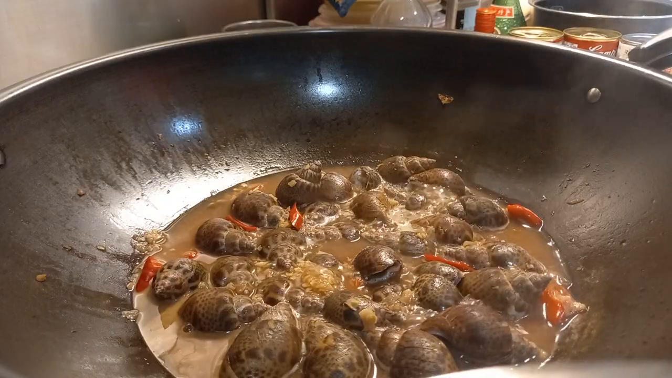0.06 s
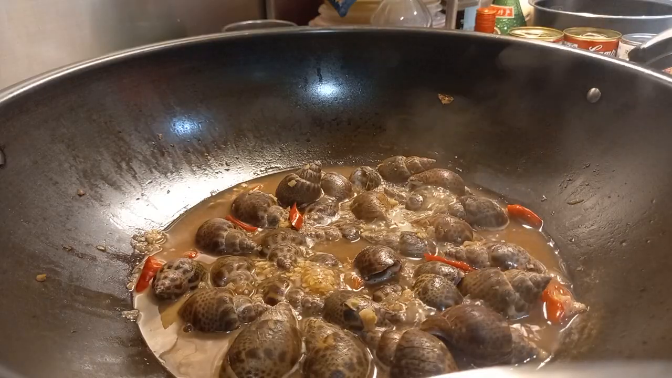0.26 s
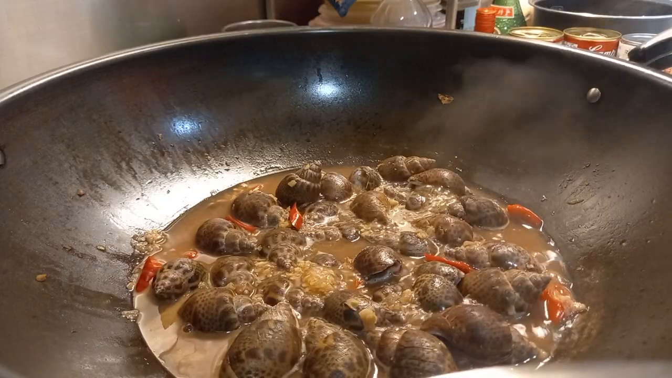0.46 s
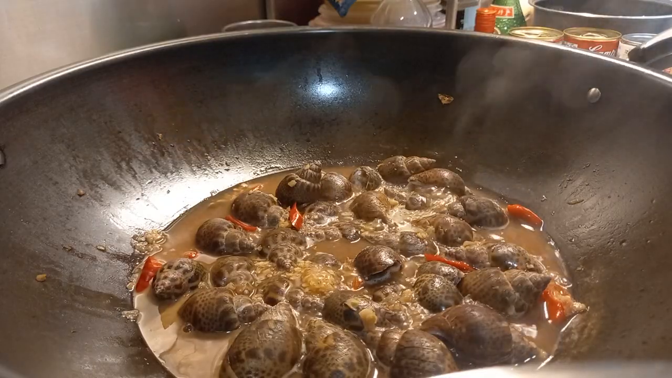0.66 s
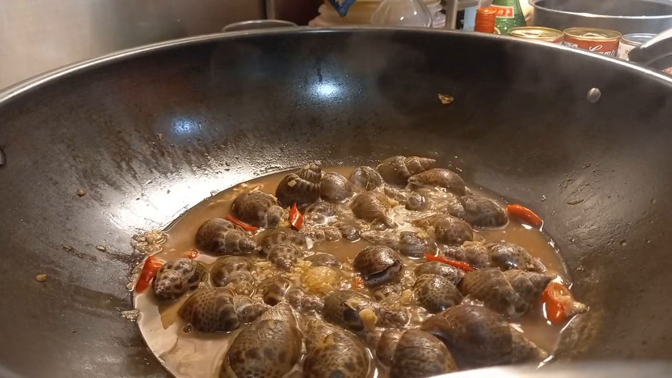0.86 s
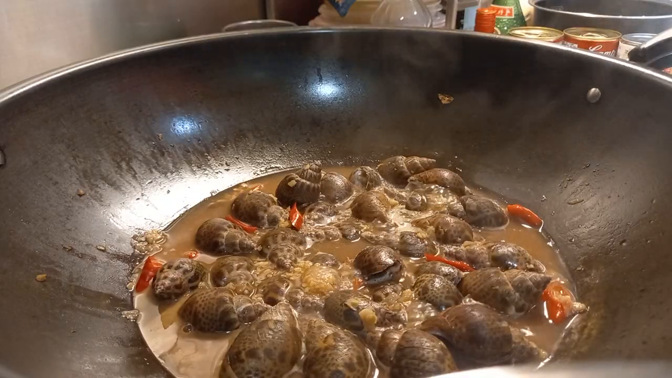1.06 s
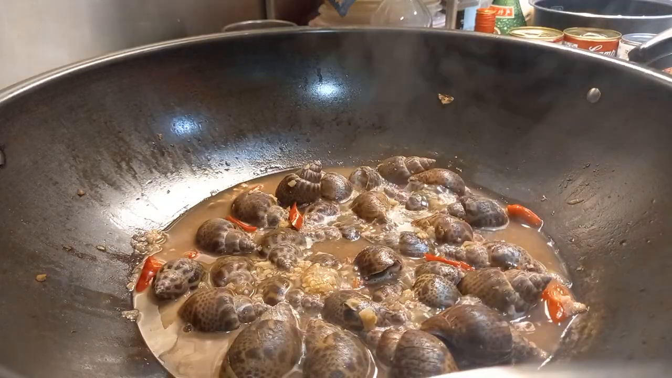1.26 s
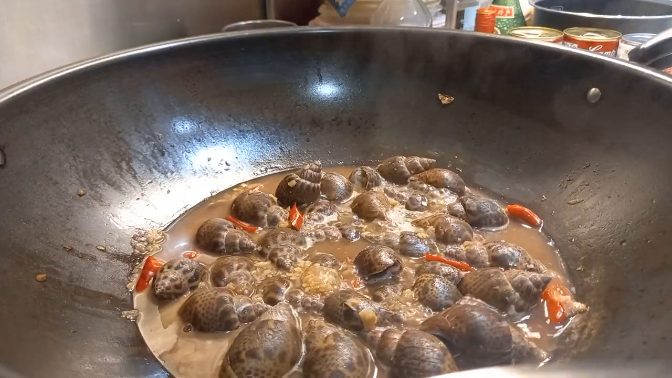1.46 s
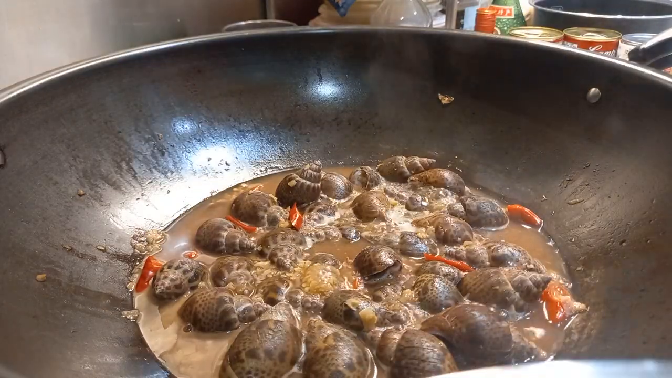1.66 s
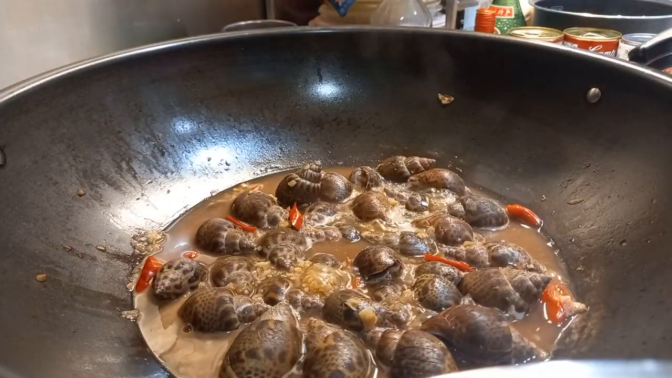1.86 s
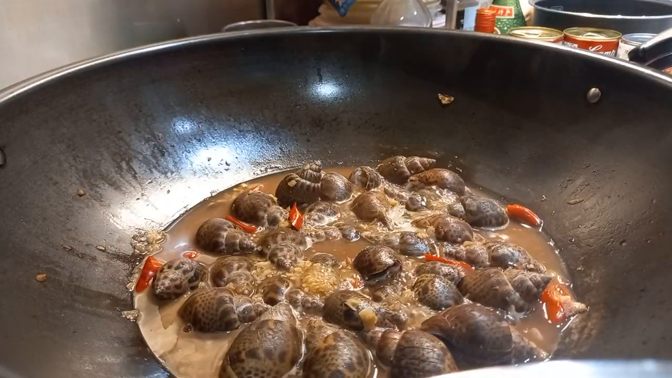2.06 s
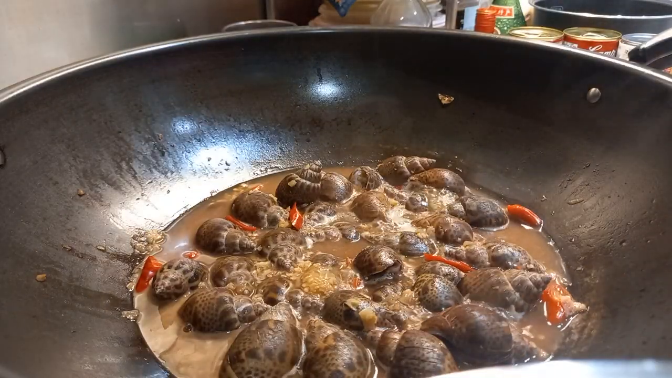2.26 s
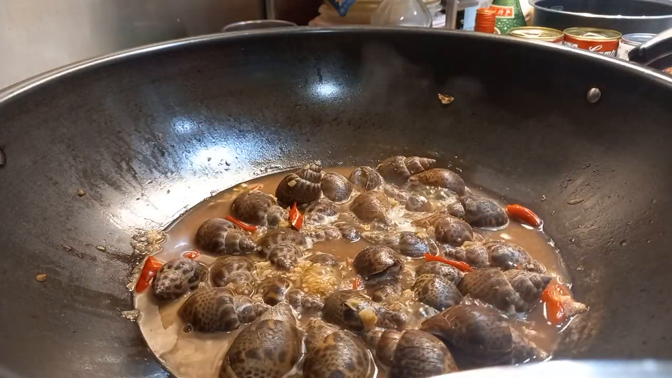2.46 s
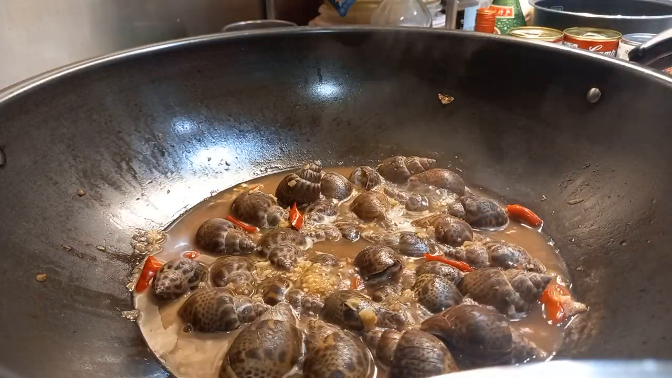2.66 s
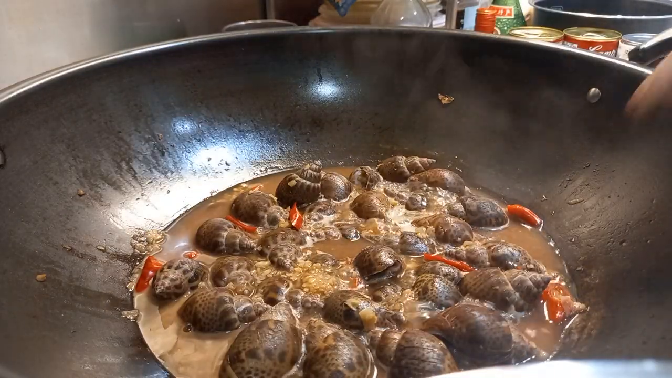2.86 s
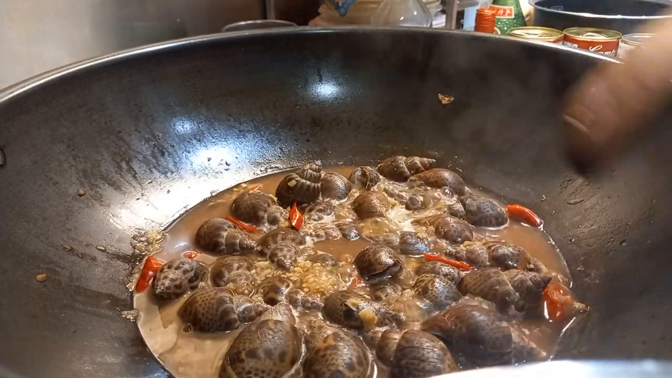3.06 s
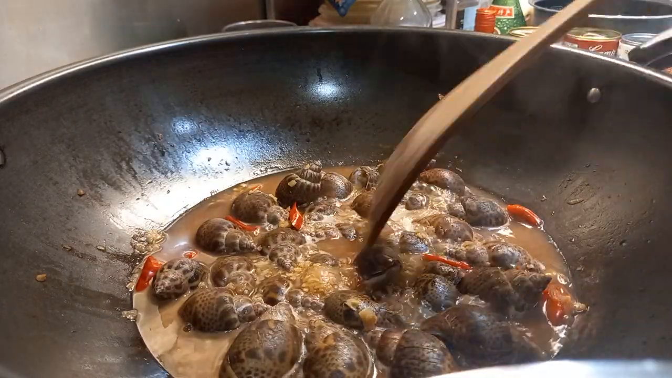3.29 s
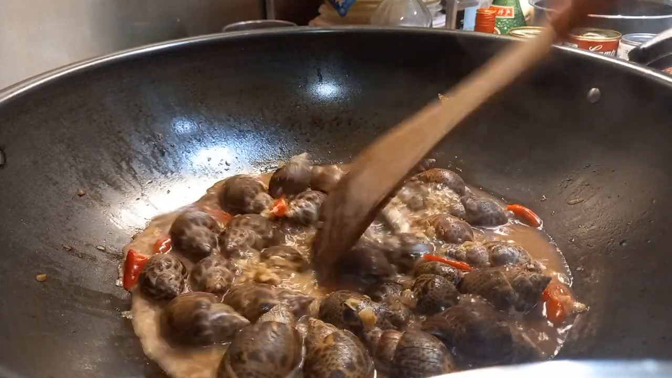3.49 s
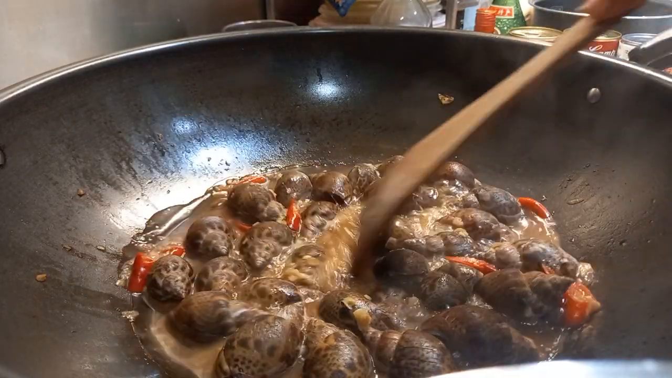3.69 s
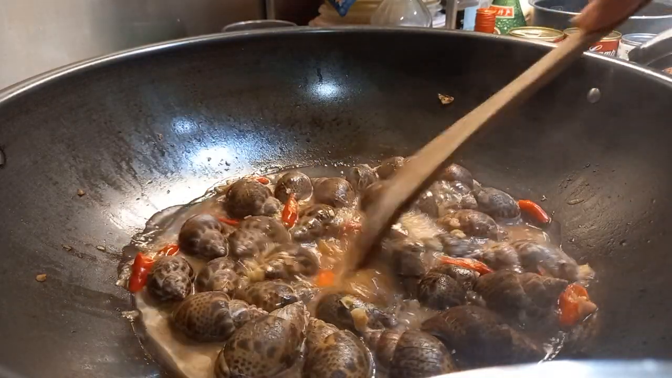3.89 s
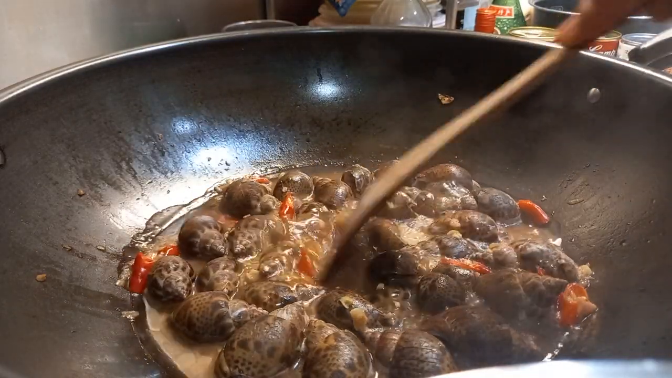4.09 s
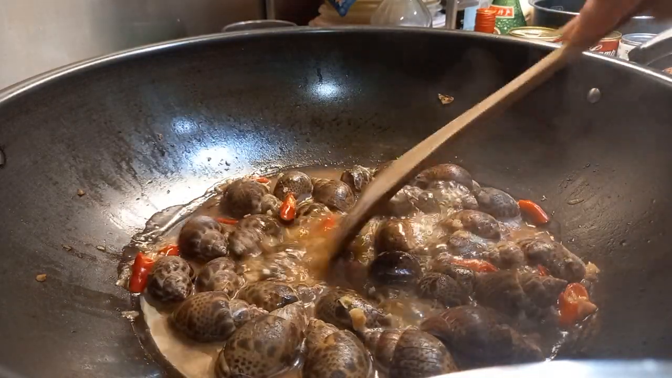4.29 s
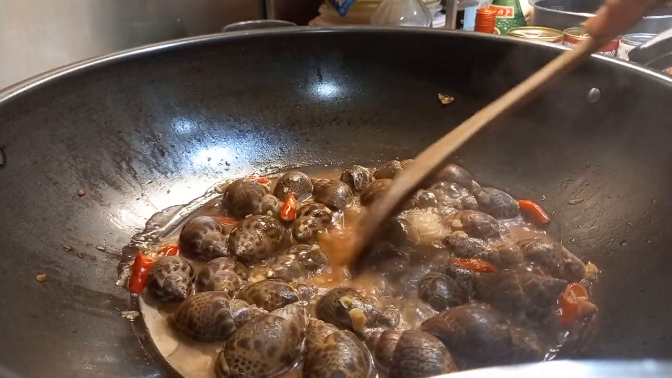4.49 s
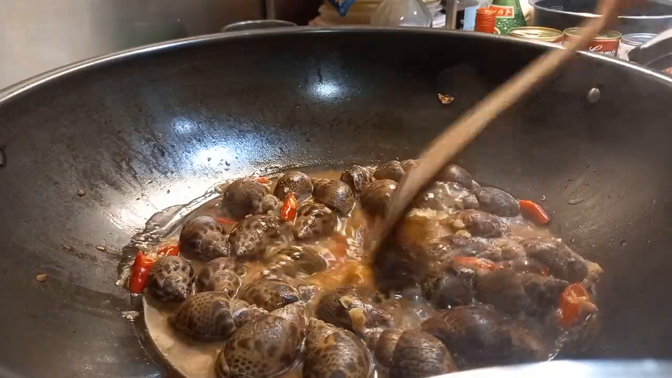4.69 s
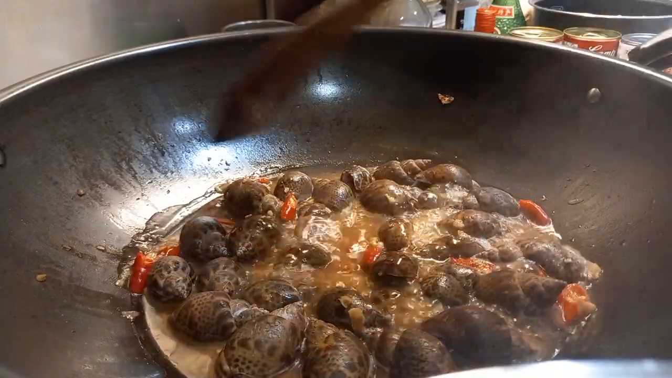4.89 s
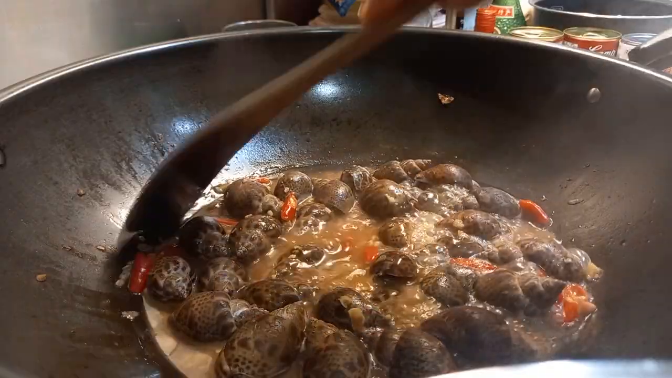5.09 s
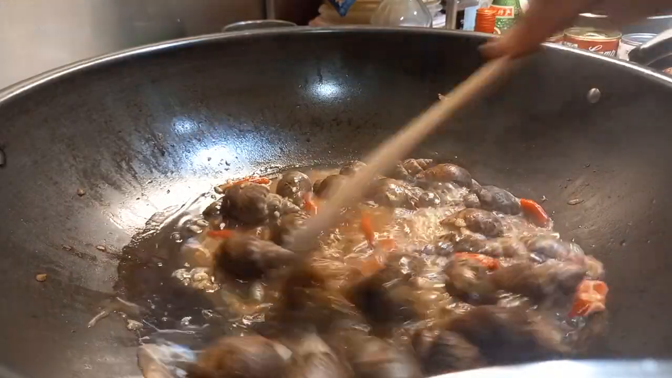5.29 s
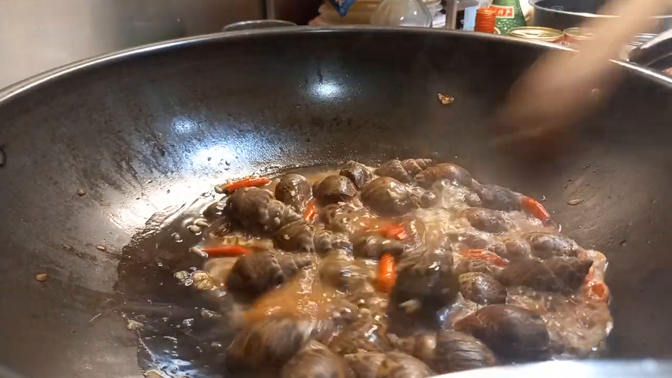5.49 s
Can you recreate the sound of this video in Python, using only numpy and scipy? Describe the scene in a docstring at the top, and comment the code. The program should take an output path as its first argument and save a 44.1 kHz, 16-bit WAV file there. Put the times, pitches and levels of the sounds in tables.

```python
"""Snail shells in a wok

Snail shells simmer in a steel wok: hissing sauce and chirping bubbles over a wavering fan hum in rumbling air.
Noisy resonances clack further off, then a low boom and rattle bump the microphone's stand and the gain ducks.
A wooden spoon rings the wok's damped modes and pushes the heap: bursts of short modes make loud shell clicks
and many small ticks, echoed by bowl and room."""
import sys
import numpy as np
from scipy import signal
from scipy.fft import rfft, irfft
from scipy.io import wavfile
from scipy.ndimage import uniform_filter1d, minimum_filter1d

SR = 44100
rng = np.random.default_rng(int(sys.argv[2]) if len(sys.argv) > 2 else 0)


def put_to_file(sound):
    """Save the sound as 16-bit audio at rate SR, in the file named by the first command-line argument."""
    columns = np.atleast_2d(sound).T  # one column per channel
    safe = np.clip(columns, -1, 1)
    whole_steps = np.round(safe * 32767)
    wavfile.write(sys.argv[1], SR, whole_steps.astype(np.int16))


N = 244314
TIME = np.arange(N) / SR  # s

# tone colour of the shells' hard lips: [f/Hz, relative level/dB]
LIP_COLOUR = [(1500, -4), (2600, -6), (4000, 2.5), (5200, -0.5), (6600, -0.5), (9000, -2.5), (15000, -10.5)]
# tone colour of the shells' hollow bodies: [f/Hz, relative level/dB]
HOLLOW_COLOUR = [(200, -21), (500, 3.5), (900, -10), (1400, 1), (2200, -0.5), (3200, -0.5), (6000, -27.5)]
# loudness of the sauce as it heats up: [t/s, level/dB]
SAUCE_HEAT = [(0, -62.5), (1.5, -59), (2.3, -72), (2.52, -50), (3.3, -50.5), (4.4, -49.5), (5.54, -45)]


def undb(db):
    """Turn decibels into a factor."""
    return 10 ** (np.asarray(db) / 20)


def unit(x):
    """Scale to rms 1."""
    return x / np.sqrt(np.mean(x ** 2))


def impulse(x):
    """Scale to energy 1 in each channel."""
    return x / np.sqrt(np.sum(x ** 2, axis=-1, keepdims=True))


def curve(rows):
    """Join (time, value) points by straight lines."""
    return np.interp(TIME, *np.transpose(rows))


def fade(t60, size):
    """Exponential decay, 60 dB down after t60 seconds."""
    return np.exp(-np.log(1000) * TIME[:size] / max(t60, 1 / SR))


def add(track, s, sound):
    """Mix a sound in at time s."""
    i = int(s * SR)
    track[..., i:i + sound.shape[-1]] += sound[..., :N - i]


def ring(x, response):
    """Pass a sound through an impulse response."""
    full = signal.fftconvolve(np.atleast_2d(x), np.atleast_2d(response), axes=-1)
    return full[:, :x.shape[-1]]


def colour(x, points, size=4096):
    """Filter through (Hz, dB) points without sounding early; white noise keeps its power."""
    hz, db = np.transpose(points)
    bins_hz = np.arange(size // 2 + 1) * SR / size
    log_gain = np.log(undb(np.interp(np.log(bins_hz + 1), np.log(hz), db)))
    # folding the cepstrum puts the response's energy as early as possible
    cepstrum = irfft(log_gain)
    cepstrum[1:size // 2] *= 2
    cepstrum[size // 2 + 1:] = 0
    return ring(x, impulse(irfft(np.exp(rfft(cepstrum)))))


def lowpass(x, hz, order=2):
    """Keep what lies below hz."""
    return signal.sosfilt(signal.butter(order, min(hz, SR / 2 - 1), fs=SR, output="sos"), x)


def highpass(x, hz):
    """Keep what lies above hz."""
    return signal.sosfilt(signal.butter(3, hz, "high", fs=SR, output="sos"), x)


def walk(rate):
    """Smooth chance with a spread of 1 and about rate new values per second."""
    k = int(SR / rate)
    steps = np.repeat(rng.standard_normal(N // k + 1), k)[:N]
    return unit(uniform_filter1d(steps, k))


def diffuse(size, apart_hz=560, bass_side=0.096):
    """Stereo noise from all around: nearly alike in the bass, unrelated in the treble."""
    mid, side = rng.standard_normal((2, size))
    side = side - (1 - bass_side) * lowpass(side, apart_hz, order=1)
    return unit(mid + side * np.array([[1], [-1]]))


def echoes(bowl_db, room_db, room_t60=0.19, size=14000):
    """Quick echoes inside the steel bowl, then the small room's tail, as fading noise."""
    bowl = impulse(diffuse(size) * fade(.05, size) * (TIME[:size] > .0008))
    room = impulse(diffuse(size) * fade(room_t60, size) * (TIME[:size] > .005))
    return undb(bowl_db) * bowl + undb(room_db) * room


def fan(air_db=-37, flutter_db=1.07, rumble_hz=170, wander_db=2):
    """A wavering motor hum in a rumble of moving air; only the bass swells."""
    # motor tones: [f/Hz, mean level/dB rms, wavering/dB]
    motor_tones = [(98.85, -36.5, 3.5), (194.4, -58, 6), (912, -60, -3)]
    # tone colour of the moving air: [f/Hz, relative level/dB]
    air_colour = [(20, -35), (38, -27.5), (55, -5.5), (72, 2.5), (110, -5.5), (160, -11), (225, -21),
                  (300, -15), (480, -21.5), (850, -21.5), (1400, -33), (2700, -39.5), (3300, -46.5),
                  (6600, -45), (15000, -52.5)]
    # swells of the bass: [t/s, gain/dB]
    bass_swell = [(0, -1), (.25, -7), (.55, 3), (.95, -4), (1.38, 6), (2.05, 3), (2.45, -10), (2.85, 1),
                  (3.1, -8.5), (3.5, -1), (5.05, -3.5), (5.54, 1)]
    hum = np.zeros(N)
    for hz, db, waver_db in motor_tones:
        amplitude = np.sqrt(2) * undb(db + waver_db * walk(14))
        hum += amplitude * np.sin(2 * np.pi * hz * TIME + 0.21 * walk(10))
    air = unit(colour(diffuse(N), air_colour)) * undb(air_db + flutter_db * walk(18))
    sound = hum + air
    # filtering both ways keeps the bass in step with the full sound
    bass = signal.sosfiltfilt(signal.butter(3, rumble_hz, fs=SR, output="sos"), sound)
    bass_gain = undb(curve(bass_swell) + wander_db * walk(7))
    return sound + bass * (bass_gain - 1)


def simmer(rate=260, pop_level=0.6):
    """A soft hiss dotted with tiny bursting bubbles, as random clicks (rate per second in each ear)."""
    # tone colour of hiss and pops: [f/Hz, relative level/dB]
    sauce_colour = [(100, -19.5), (400, 6.5), (1000, -2.5), (1900, 3), (2600, -4.5), (3100, 0), (3350, -12),
                    (6400, -19.5), (9000, -10.5), (15000, -11.5)]
    pops = (rng.random((2, N)) < rate / SR) * rng.laplace(size=(2, N))
    hiss = diffuse(N) + pop_level * unit(pops)
    return unit(colour(hiss, sauce_colour)) * undb(curve(SAUCE_HEAT) + 0.95 * walk(9.7))


def bubbles(cycles=24, glide=0.31, small_db=-1, small_hz=1800, octaves=0.62, scatter_db=3, count=90,
            size=6000):
    """Bubbles ring for some cycles and rise in pitch as they open; small ones follow the simmer's level."""
    # the biggest bubbles: [t/s, relative level/dB, middle of the glide f/Hz]
    big_bubbles = [(0.826, -48, 2740), (1.055, -43, 412), (1.826, -47, 2280), (2.985, -39, 1860)]
    out, heat_db, small = np.zeros(N), curve(SAUCE_HEAT), []
    for when, strength, pitch in rng.uniform(-1, 1, (count, 3)):
        i = int((when + 1) / 2 * (N - 1))
        db = heat_db[i] + small_db + scatter_db * strength
        small.append((TIME[i], db, small_hz * 2 ** (2 * octaves * pitch)))
    for s, db, hz in big_bubbles + small:
        decay = fade(cycles / hz, size)
        turns = np.cumsum(hz * (1 + glide * (.5 - decay))) / SR
        add(out, s, undb(db) * decay * np.sin(2 * np.pi * turns))
    return np.array([out, out])


def clacks(tail_t60=0.26, sag=0.1417, sag_t60=0.219, rise_t60=0.01, size=20000):
    """Distant knocks arrive mostly as room sound, each with one broad resonance that sags in pitch."""
    # things set down further off:
    # [t/s, relative level/dB, final resonance f/Hz, width/Hz, resonance level/dB, resonance t60/s]
    distant_knocks = [(0.2049, -26, 2316, 490, -4, 0.32), (0.347, -24, 871, 1100, -7, 0.22),
                      (0.527, -44.5, 642, 1300, 3.5, 0.19)]
    # their tone colour: [f/Hz, relative level/dB]
    distant_colour = [(100, 13.5), (400, 3.5), (1500, 4), (3500, -5), (5500, 0), (7000, -3), (10000, 0.5),
                      (15000, -8.5)]
    out, onset = np.zeros((2, N)), 1 - fade(rise_t60, size)
    for s, db, hz, width_hz, peak_db, t60 in distant_knocks:
        # slow noise, turned up to the sagging pitch, makes a band of noise around it
        turn = np.exp(2j * np.pi * np.cumsum(hz * (1 + sag * fade(sag_t60, size))) / SR)
        slow_noise = lowpass(diffuse(size) + 1j * diffuse(size), width_hz / 2)
        resonance = undb(peak_db) * unit(np.real(turn * slow_noise)) * fade(t60, size)
        tail = diffuse(size) * fade(tail_t60, size)
        add(out, s, undb(db) * onset * (tail + resonance))
    return colour(out, distant_colour)


def bumps(boom_hz=83.25, boom_t60=0.35, low_cut_hz=56, rise_t60=0.0062, room_db=-9, echo_s=0.0906,
          echo_db=-15, size=30000):
    """The stand booms at its one low mode and rattles; both ports feel the same shake."""
    # bumps on the stand: [t/s, relative boom level/dB, relative rattle level/dB, rattle t60/s]
    stand_bumps = [(1.4408, -17, -18.5, 0.25), (1.448, -6.5, -25, 0.3), (1.4982, 11.5, 0.5, 0.074)]
    # tone colour of the rattle: [f/Hz, relative level/dB]
    rattle_tone = [(40, -24), (130, 1.5), (220, -5.5), (350, -2.5), (550, -4.5), (1000, -13), (1700, -13.5),
                   (2100, -21.5), (2800, -23), (3500, -30.5), (6500, -37.5), (15000, -42.5)]
    boom, rattle = np.zeros((2, N))
    for s, boom_db, rattle_db, t60 in stand_bumps:
        mode = fade(boom_t60, size) * np.sin(2 * np.pi * boom_hz * TIME[:size])
        add(boom, s, -undb(boom_db) * mode)
        envelope = fade(t60, size) * (1 - fade(rise_t60, size))
        add(rattle, s, undb(rattle_db) * envelope * rng.standard_normal(size))
    # the push is soft, and the room hands the boom back a moment later
    boom = lowpass(boom, 260)
    add(boom, 0, undb(echo_db) * np.roll(lowpass(boom, 100), int(echo_s * SR)))
    rattle = colour(rattle, rattle_tone)
    room = impulse(diffuse(size) * fade(0.33, size))
    shake = boom + rattle + undb(room_db) * ring(rattle, room)
    # deep bass below low_cut_hz is cut away from the boom and rattle
    return highpass(shake, low_cut_hz)


def wok_ring(size=20000):
    """The wok's answer to a sharp tap: a sum of fading tones, damped by its load."""
    # modes of the wok: [f/Hz, relative level/dB, t60/s]
    wok_modes = [(358, -20, 0.082), (471.5, -8, 0.1), (443.8, -17.5, 0.31), (570, -4, 0.021),
                 (624, -13.5, 0.042), (817, -4.5, 0.037), (1213, -9, 0.022), (1476, -4, 0.01),
                 (2300, -28, .035), (3930, -15, 0.15), (4120, -13, .15), (4700, -18, 0.17),
                 (4814, -19, 0.11), (6200, -14, .14), (6300, -13, .14)]
    return sum(undb(db) * fade(t60, size) * np.sin(2 * np.pi * hz * TIME[:size]) for hz, db, t60 in wok_modes)


def spoon(low_cut_hz=320, gain_db=2):
    """Wood is soft: the longer the contact, the fewer of the wok's high modes ring."""
    # wooden spoon on the wok: [t/s, relative level/dB, contact cut-off f/Hz]
    spoon_knocks = [(3.3779, -11.5, 2440), (3.461, -26, 2500), (3.524, -27, 2500), (3.891, -30.5, 1500),
                    (4.022, -30.5, 1290), (4.700, -29.5, 1630), (5.1034, -12, 1300), (5.178, -28, 2200),
                    (5.272, -35, 3000), (5.411, -24, 2200)]
    out, tap = np.zeros(N), wok_ring()
    for s, db, contact_hz in spoon_knocks:
        add(out, s, undb(db + gain_db) * lowpass(tap, contact_hz, order=4))
    # the two faces of the thin steel cancel in the bass
    out = highpass(out, low_cut_hz)
    ports = np.array([out, np.roll(out, 11)])  # the right port hears it 11 samples later
    return ports + ring(ports, echoes(bowl_db=-9, room_db=-7))


def shell_ring(hz, t60, octaves=0.402, count=30, size=1024):
    """A ribbed shell has many short modes, scattered around its pitch."""
    modes_hz = np.minimum(hz * 2 ** (octaves * rng.standard_normal((count, 1))), .45 * SR)
    turns = modes_hz * TIME[:size] + rng.random((count, 1))
    return impulse(np.sin(2 * np.pi * turns).sum(axis=0) * fade(t60, size))


def chatter(hz, length_s, crack=1.0, ring_t60=0.016, bounce=0.9, count=5, size=2048):
    """A few contacts in quick succession, each weaker, with its own ring and dry crack."""
    out = np.zeros(size)
    for k in range(count):
        jitter = min(k, 1) * rng.uniform(-.5, .5)  # none for the first contact
        late_s = min(length_s, .02) * (k + jitter) / count
        snap = impulse(rng.standard_normal(size) * fade(.01, size))
        contact = shell_ring(hz, ring_t60, size=size) + crack * snap
        i = int(late_s * SR)
        out[i:] += bounce ** k * contact[:size - i]
    return impulse(out)


def shells(lip_db=14, body_db=11.0, lip_hz=4550, body_hz=1550, chatter_s=.005, chatter_scatter=.2,
           pan_scatter_db=1):
    """Hard lips click, hollow bodies clack; each place in the bowl has its own echoes and port delays."""
    # the loudest shells, against shell or steel: [t/s, relative level/dB, relative hollow body level/dB]
    loud_shells = [(3.378, -27.5, 3.5), (3.3985, -11, -9), (3.413, -26, -12), (3.471, -23, -18),
                   (3.5229, -27, 5.5), (3.5399, -20, -8.5), (3.5483, -18, -18.5), (3.58, -30, -1),
                   (3.6354, -23.5, -4), (3.683, -30.5, -.5), (3.7286, -28.5, -20), (4.0321, -20, -18.5),
                   (4.073, -26.5, -24.5), (4.201, -28.5, -4.5), (4.3373, -30, -5), (4.405, -35, 0.5),
                   (4.578, -34.5, -11), (4.707, -13.5, -7.5), (5.180, -21, -0.5), (5.219, -18.5, -11),
                   (5.226, -11, -11), (5.2398, -12.5, -17), (5.2731, -6.5, -7.5), (5.303, -8, -10),
                   (5.337, -17.5, -18), (5.3544, -17, -7.5), (5.402, -25, -5), (5.412, -23, 2.5),
                   (5.496, -27.5, -2.5)]
    lips, bodies = np.zeros((2, 2, N))
    for s, db, hollow_db in loud_shells:
        lag = rng.integers(0, 13, 2)  # samples, one for each port
        place, linger = rng.standard_normal(2)
        gain = undb(db + pan_scatter_db * place * np.array([[1], [-1]]) / 2)
        length_s = chatter_s * np.exp(chatter_scatter * linger)
        for track, hz, part_db in ((lips, lip_hz, 0), (bodies, body_hz, hollow_db)):
            sound = echoes(bowl_db=0.0, room_db=3.5)
            direct = chatter(hz, length_s)
            for ear in range(2):
                add(sound[ear], lag[ear] / SR, direct)
            add(track, s, gain * undb(part_db) * sound)
    return undb(lip_db) * colour(lips, LIP_COLOUR) + undb(body_db) * colour(bodies, HOLLOW_COLOUR)


def stirring(rise_db_per_s=450, settle_db_per_s=130, restless_db=-59):
    """How much the heap moves: each push rises quickly, holds and settles slowly, never quite to rest."""
    # pushes of the spoon through the heap: [t/s, level of the small ticks/dB, length/s]
    spoon_pushes = [(3.403, -42.5, 0.18), (3.774, -46, 0.023), (3.912, -47.5, 0.015), (4.16, -51, 0.15),
                    (4.734, -53, 0.035), (5.013, -49.5, 0.015), (5.218, -31.5, 0.12), (5.492, -49.5, .04)]
    motion = undb(restless_db) * (TIME > spoon_pushes[0][0])
    for s, db, length_s in spoon_pushes:
        before, after = np.maximum(s - TIME, 0), np.maximum(TIME - s - length_s, 0)
        push = undb(db - rise_db_per_s * before - settle_db_per_s * after)
        motion = np.maximum(motion, push)
    return motion


def heap(rate=420, spread_db=0.5, body_db=-5, lip_hz=4700, body_hz=1500, count=14):
    """Many small shells jostle as the spoon moves them: rate ticks per second, shared by count voices."""
    lips, bodies = np.zeros((2, 2, N))
    for _ in range(count):
        strength = undb(spread_db * np.minimum(rng.exponential(size=N), 3))
        ticks = (rng.random(N) < rate / count / SR) * strength
        for track, hz in ((lips, lip_hz), (bodies, body_hz)):
            sound = ring(ticks, chatter(hz, 0.00209, count=2))[0]
            for ear in range(2):
                add(track[ear], rng.integers(0, 7) / SR, sound)
    out = colour(lips, LIP_COLOUR) + undb(body_db) * colour(bodies, HOLLOW_COLOUR)
    return unit(out) * stirring()


def scene(left_db=0.8):
    """Mix all sources; the left port is a little louder than the right."""
    ticks = heap() + undb(6) * bubbles()
    clatter = shells() + ticks + ring(ticks, echoes(bowl_db=-4.0, room_db=-5.5))
    # the shells lie on the steel and set it ringing faintly
    clatter = clatter + undb(-24.0) * ring(clatter, impulse(wok_ring()))
    mix = clatter + spoon() + clacks() + fan() + simmer() + bumps()
    return mix * undb(np.array([[left_db], [-left_db]]) / 2)


def gain_control(x, ceiling_db=-0.42, hold_s=1.033, release_db_per_s=17):
    """A peak over the ceiling pulls the gain down; it waits, then creeps back."""
    peak_db = 20 * np.log10(np.abs(x).max(axis=0) + 1e-9)
    over = np.maximum(peak_db - ceiling_db, 0)
    size = int(hold_s * SR)
    # the largest excess of the last hold_s seconds
    held = -minimum_filter1d(-over, size, origin=(size - 1) // 2, mode="constant")
    cut_db = np.maximum.accumulate(held + release_db_per_s * TIME) - release_db_per_s * TIME
    # it looks a few milliseconds ahead
    return x * undb(-uniform_filter1d(np.roll(cut_db, -90), size=200))


def record(dry, shelf_hz=7045, shelf_db=-14.5, top_hz=15900):
    """The microphone's treble steps down, the gain control acts and the very top is cut."""
    hz = np.arange(N // 2 + 1) * SR / N
    step = (1 + np.tanh((hz - shelf_hz) / 220)) / 2
    dull = irfft(rfft(dry) * undb(shelf_db * step), N)
    top_cut = signal.ellip(8, .2, 70, top_hz, fs=SR, output="sos")
    return signal.sosfilt(top_cut, gain_control(dull))


dry = scene()
out = record(dry)
put_to_file(out)
```